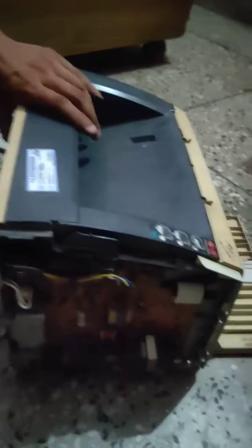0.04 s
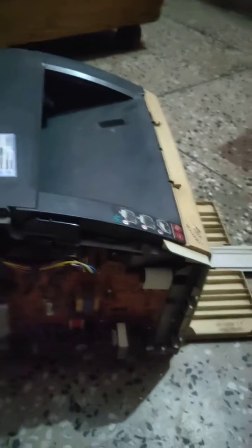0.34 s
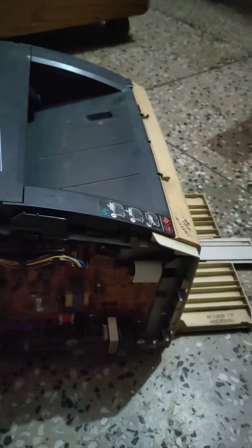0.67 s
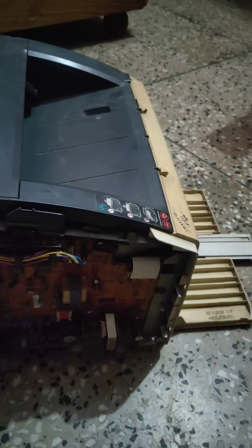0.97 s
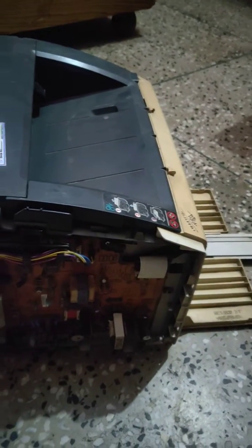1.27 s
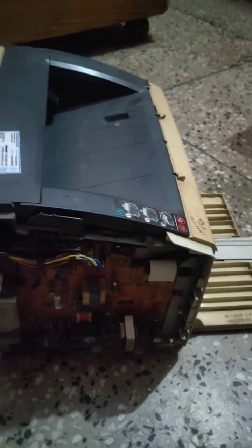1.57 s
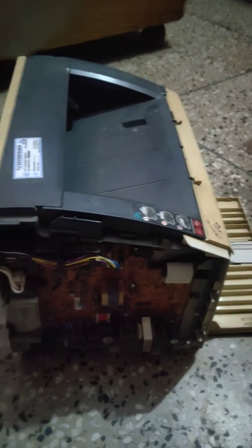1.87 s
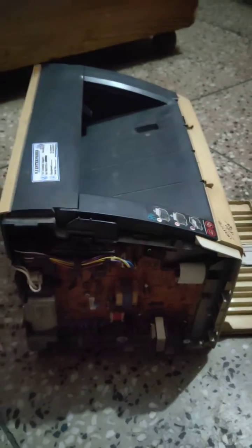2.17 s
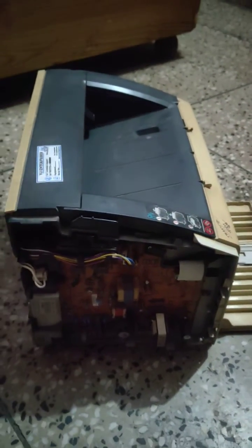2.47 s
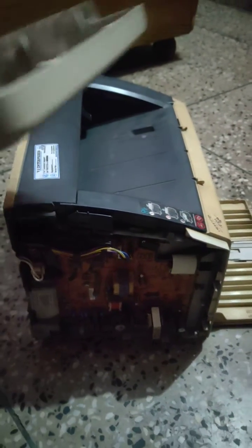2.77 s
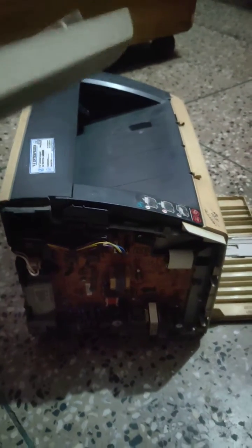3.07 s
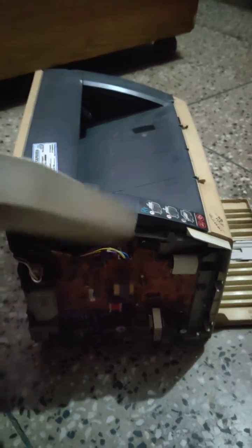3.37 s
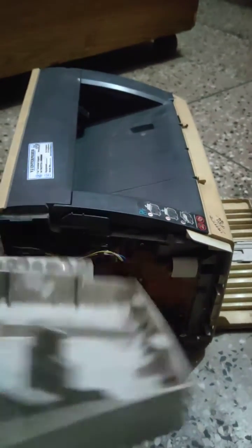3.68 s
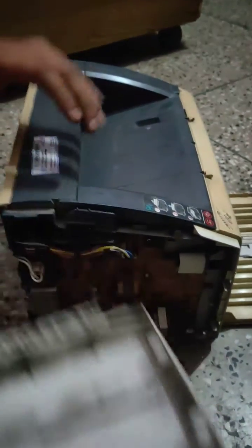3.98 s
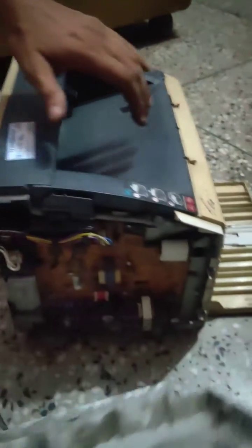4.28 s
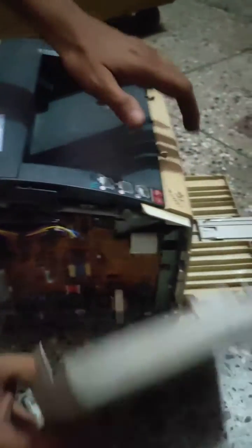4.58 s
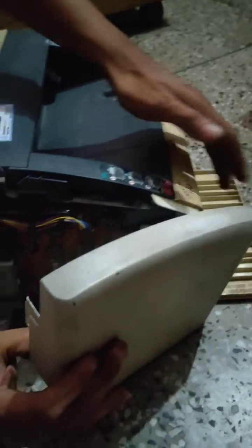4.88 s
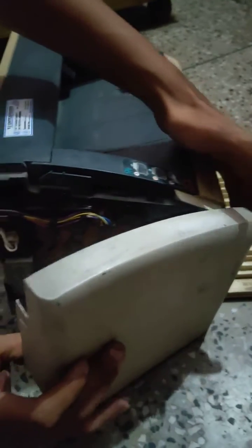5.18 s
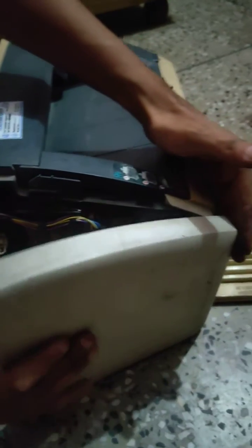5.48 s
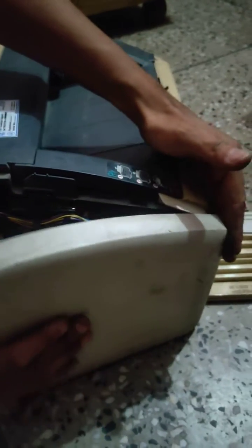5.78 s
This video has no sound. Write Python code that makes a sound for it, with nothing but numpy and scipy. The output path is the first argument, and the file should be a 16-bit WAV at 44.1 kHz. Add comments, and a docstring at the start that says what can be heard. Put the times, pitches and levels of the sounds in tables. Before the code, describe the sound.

A hard plastic cover is handled in a small room, giving three hollow knocks, then light scrapes and clicks.

```python
"""In a small room with a stone floor, someone handles a hard plastic printer cover.
It knocks as it is picked up, slides through the hand, snaps once and knocks down on its edge;
each blow sets the whole shell ringing. Then it scrapes and clicks against the dismantled machine
as the plastic sticks and slips and its tabs catch. Faint chirps, hum and hiss lie underneath."""
import sys
import numpy as np
from scipy import signal
from scipy.io import wavfile

SR = 44100
rng = np.random.default_rng(int(sys.argv[2]) if len(sys.argv) > 2 else 0)


def digitize_waveform(pressure):
    """Quantize a signal to 16-bit integers and store it at the path in sys.argv[1].

    Rows of a 2-D input are taken as channels; values are limited to [-1, 1].
    """
    field = np.atleast_2d(pressure).T
    bounded = np.clip(field, -1, 1)
    quanta = np.round(bounded * 32767).astype(np.int16)
    wavfile.write(sys.argv[1], SR, quanta)


N = 257544
TIME = np.arange(N) / SR  # seconds into the scene
RING = np.arange(int(SR * .7)) / SR  # seconds into one short sound

# Three hard blows, each on its own spot: (time [s], ring build-up [s], crack level [dB],
# crack pitch [Hz], crack width [Hz], crack decay [s], bounce delay [s], bounce level [dB],
# bounce pitch [Hz])
BLOWS = [(1.4578, 0.0082, -21, 1400, 1000, 0.0036, 0.00455, -13, 440),
         (4.3228, 0.0013, -15, 2570, 1700, 0.0048, 0.00593, -21, 660),
         (3.4742, 0.0016, -15, 3540, 1370, 0.0042, 0.0061, -19, 2300)]
# The shell's clear tones: (pitch [Hz], time to fade 60 dB [s], level at spot 1, 2, 3 [dB])
SHELL_TONES = [(150.0, 0.5, -50.0, -59.0, -72.0), (171.0, 0.5, -39.0, -59.0, -74.0),
               (228.0, 0.5, -29.0, -40.0, -75.0), (296.0, 0.34, -30.0, -44.0, -65.0),
               (319.0, 0.34, -23.0, -29.0, -61.0), (373.0, 0.34, -22.0, -23.0, -46.0),
               (405.0, 0.34, -27.0, -41.0, -52.0), (441.0, 0.34, -28.0, -32.0, -42.0),
               (500.0, 0.34, -31.0, -35.0, -51.0), (560.0, 0.22, -30.0, -20.0, -49.0),
               (586.0, 0.34, -29.0, -18.5, -50.0), (644.0, 0.34, -16.0, -19.0, -40.0),
               (765.0, 0.24, -30.0, -33.0, -41.0), (806.0, 0.24, -22.0, -36.0, -38.0),
               (860.0, 0.3, -29.0, -43.0, -53.0), (933.0, 0.3, -29.0, -32.0, -39.0),
               (1023.0, 0.3, -33.0, -30.0, -55.0), (1110.0, 0.3, -37.0, -37.0, -60.0),
               (1235.0, 0.3, -36.0, -30.0, -37.0), (1438.0, 0.3, -50.0, -37.0, -31.0),
               (1567.0, 0.3, -38.0, -35.0, -63.0), (1661.0, 0.3, -37.0, -31.0, -57.0),
               (1732.0, 0.3, -33.0, -31.0, -51.0), (1830.0, 0.3, -49.0, -34.0, -43.0),
               (2053.0, 0.3, -42.0, -32.0, -38.0), (2218.0, 0.3, -46.0, -37.0, -43.0),
               (2335.0, 0.3, -41.0, -28.0, -30.0), (2589.0, 0.3, -50.0, -36.0, -53.0),
               (2832.0, 0.3, -52.0, -38.0, -46.0), (3332.0, 0.3, -73.0, -45.0, -52.0)]
# Boost of those tones, one for each spot: (level [dB])
SPOT_BOOST_DB = [1, -1.5, -1.5]
# The blur of weaker tones between them: (pitch [Hz], time to fade 60 dB [s], level at spot 1, 2, 3 [dB])
WEAK_TONES = [(25, 0.61, -52, -38, -70), (81, 1, -22.5, -35, -52.5), (182, 0.81, -12.5, -33.5, -66),
              (333, 0.59, -8, -13, -36), (607, 0.41, -7, -8, -29), (885, 0.53, -11, -12.5, -24.5),
              (1600, 0.35, -13, -14, -26.5), (2286, 0.37, -19.5, -11.5, -18),
              (3430, 0.33, -25.5, -20.5, -31), (5790, 0.32, -33.5, -25.5, -28.5),
              (7700, 0.26, -35.5, -34, -41.5), (8000, 0.09, -66, -54, -67)]
def blows():
    """Each blow cracks, bounces within milliseconds and sets the whole shell ringing."""
    out, weak = np.zeros(N), np.array(WEAK_TONES)
    smother = np.exp(-(RING / 0.27) ** 2)  # the hand and the floor cut the ring short
    bounce = RING / .0014 * np.exp(1 - RING / .0014)  # a second, very brief contact
    for spot, blow in enumerate(BLOWS):
        start, build, crack_db, crack_hz, width, decay, delay, bounce_db, bounce_hz = blow
        tones = sum(amp(levels[spot]) * 1000. ** (-RING / fade) * sine(hz, RING)
                    for hz, fade, *levels in SHELL_TONES)
        blur = colour(fading_noise(weak[:, :2]), weak[:, [0, 2 + spot]])
        # the ring builds up as waves cross the shell, the blur first
        add(out, start, amp(SPOT_BOOST_DB[spot]) * tones * smother * (1 - np.exp(-RING / build)))
        add(out, start, blur * np.sqrt(smother) * (1 - np.exp(-2 * RING / build)))
        # a small contact gives off little bass
        crack = colour(burst(crack_hz, width, decay), [(100, -27.0), (700, -0.5)])
        add(out, start, amp(crack_db) * crack)
        add(out, start + delay, amp(bounce_db) * bounce * np.sin(2 * np.pi * bounce_hz * RING))
    return out


# Tabs and edges catching: (time [s], tick level [dB], knock level [dB], brightness [dB], rise [s])
CLICKS = [(1.599, -41, -31.5, -8.5, .008), (2.92, -48, -69, 2.5, .006), (3.237, -39, -61, -6.5, .007),
          (3.384, -31.5, -66, -12, .008), (4.7167, -36, -54, -3.5, .0025),
          (4.7895, -30, -30.5, -17.5, .004), (4.8114, -36.5, -37.5, -12.5, .002),
          (4.8234, -32.5, -27.5, -15.5, .0022), (4.8544, -33, -36, -25, .0035),
          (4.919, -38.5, -44, -24, .003), (5.118, -30.5, -40.5, -19.5, 0.0044),
          (5.156, -39.5, -57, -26, .0026), (5.547, -34.5, -37, -27.5, .0035),
          (5.5807, -23.5, -36.5, -5, .0017), (5.732, -36, -60, -16, .009), (5.7902, -38, -37, -21, .002)]
# The tone colour of a tab's tick: (pitch [Hz], level [dB])
CLICK_COLOUR = [(760, -26), (1300, -86), (1480, -57), (1620, 4), (1920, -8.5), (2180, 9), (2740, -4.5),
                (3020, 0), (3890, 0.5), (4390, -2), (5030, -15.5), (5860, -1), (6320, -27.5), (7590, -10),
                (8000, -43), (10400, -48.5), (17600, -120)]
def clicks():
    """Tabs catch and let go: a bright tick, duller where it chafes, and a knock of the hollow body."""
    ticks, body = np.zeros(N), np.zeros(N)
    for start, db, knock_db, treble_db, rise in CLICKS:
        contact = np.exp(-RING / (rise + 0.0007)) * (1 - np.exp(-RING / rise))
        tick = colour(rng.standard_normal(len(RING)) * contact, CLICK_COLOUR)
        tick = colour(tick, [(2000, 0), (3200, min(treble_db + 12, 0) * 0.7), (5500, treble_db + 11.5)])
        add(ticks, start, amp(db) * tick / abs(tick).max())
        knock = burst(hz=608, width_hz=150, decay_s=0.0074) * (1 - np.exp(-RING / 0.0018))
        add(body, start, amp(knock_db) * knock)
    ticks = flicker(room(ticks, echo_db=-5.5), depth_db=4.5, width_hz=220, hold_s=0.13)
    return ticks + room(body, echo_db=-3.5)


# Plastic sliding through the hand: (time [s], length [s], rise [s], level [dB])
RUBS = [(1.206, 0.052, .03, -67), (1.525, 0.062, 0.037, -58), (1.881, 0.018, 0.013, -78),
        (2.295, 0.039, 0.024, -45.5), (2.53, 0.084, 0.076, -60.5), (2.785, 0.42, 0.091, -60.5),
        (2.997, 0.46, .055, -47), (3.855, 0.012, 0.01, -60), (4.782, 0.1, .015, -56.5),
        (5.305, 0.051, .05, -47.5), (5.482, 0.063, 0.034, -48), (5.717, 0.02, 0.019, -54.5)]
# Tones of the panel under a light touch: (pitch [Hz], width [Hz], level [dB])
PANEL_TONES = [(2454, 110, -7.5), (3103, 130, -3.5), (3900, 250, -8), (4500, 120, -2), (5430, 490, 1),
               (5964, 200, 3.5), (7490, 110, -7)]
# The tone colour of a firm rub: (pitch [Hz], level [dB])
FIRM_COLOUR = [(700, -30.5), (1020, -15), (1200, -21.5), (1620, -26), (1840, -5.5), (2080, -4),
               (2250, -27.5), (2410, 1.5), (2600, -6), (2690, 4.5), (3160, 6), (4060, 1.5), (4390, -0.5),
               (6210, 0), (7580, -5.5), (8200, -24), (10700, -58), (18000, -120)]
def sliding():
    """Skin on textured plastic: a light touch wakes a few tones, a firm one makes a gritty hiss."""
    friction = room(slips(per_s=8000, spread_db=2.5), echo_db=-1)
    light = unit(sum(amp(db) * band(friction, hz, width) for hz, width, db in PANEL_TONES))
    light = flicker(light, depth_db=5.5, width_hz=180, hold_s=0.09)
    firm = flicker(unit(colour(friction, FIRM_COLOUR)), depth_db=5.5, width_hz=240, hold_s=0.11)
    rubs = [amp(db) * stroke(start, length, rise, fade_db_per_s=132) for start, length, rise, db in RUBS]
    # a tab skids on after it lets go, more so when its click is loud and bright
    skids = [amp(-25 + 0.58 * (db + treble_db)) * stroke(start, 0.0017, 0.0017, fade_db_per_s=150)
             for start, db, _, treble_db, _ in CLICKS]
    pressure = np.linalg.norm(rubs + skids, axis=0)
    firmness = pressure / (pressure + amp(-50))  # the hiss takes over around -50 dB
    return pressure * (np.sqrt(firmness) * firm + (1 - firmness) * light)


# The shell being dragged: (time [s], length [s], level [dB], rumble level [dB], scrape pitch [Hz])
DRAGS = [(0.17, 0.15, -69.5, -66, 700), (0.587, 0.088, -57, -65, 646), (1.102, 0.27, -76, -63.5, 686),
         (1.669, 0.3, -63, -82, 866), (2.093, .4, -67, -76, 700), (2.563, 0.29, -64, -68.5, 926),
         (3.021, 0.15, -57, -55.5, 897), (3.253, 0.13, -68.5, -70, 900), (3.885, 0.47, -60.5, -61, 962),
         (4.583, 0.063, -58.5, -71, 1015), (4.764, 0.14, -48.5, -65, 538), (5.049, .1, -54.5, -57.5, 967),
         (5.297, 0.18, -57, -61, 700), (5.48, 0.15, -53.5, -57.5, 620), (5.697, .12, -64, -65, 600)]
# Tones of the cover's hollow: (pitch [Hz], width [Hz], level [dB])
HOLLOW_TONES = [(324, 180, -6), (403, 60, -4.5), (599.5, 91, 0), (743.4, 39, 5.5), (1006, 146, 1)]
def dragging():
    """Coarser slips ring the hollow of the cover and make a gliding scrape, over a low rumble."""
    friction = slips(per_s=700, spread_db=4.5)
    hollow = sum(amp(db) * band(friction, hz, width) for hz, width, db in HOLLOW_TONES)
    hollow = flicker(unit(room(hollow, echo_db=-2.0)), depth_db=9.0, width_hz=250, hold_s=0.11)
    starts, lengths, level_db, rumble_db, pitches = np.transpose(DRAGS)
    moves = np.array([stroke(start, length, rise_s=0.053, fade_db_per_s=115)
                      for start, length in zip(starts, lengths)])
    glide_hz = np.interp(TIME, starts + lengths / 2, pitches)
    scrape = unit(resonate(resonate(friction, glide_hz, width_hz=120), glide_hz, width_hz=76))
    rumble = unit(band(rng.standard_normal(N), hz=85, width_hz=110))
    return (hollow + amp(-2) * scrape) * (amp(level_db) @ moves) + rumble * (amp(rumble_db) @ moves)


# Dull bumps of fingers on the shell: (time [s], level [dB], pitch [Hz])
BUMPS = [(0.003, -37.5, 773), (0.165, -50, 675), (0.281, -45.5, 1140), (0.794, -48.5, 717),
         (1.404, -45, 645), (1.817, -43.5, 814), (2.209, -54, 950), (2.527, -48.5, 740),
         (2.628, -48.5, 754), (2.744, -43.5, 316), (2.799, -44, 1027), (3.047, -47.5, 420),
         (3.288, -47.5, 754), (3.624, -44.5, 722), (3.783, -49.5, 553), (3.897, -44.5, 988),
         (4.03, -44.5, 904), (4.205, -40, 693), (4.904, -34, 530), (5.07, -38.5, 570), (5.122, -34.5, 1043),
         (5.489, -32, 578)]
# Soft, low thumps of handling: (time [s], level [dB], pitch [Hz])
THUMPS = [(0.19, -46, 85.5), (1.622, -52, 218), (3.238, -45.5, 97.7), (3.583, -52, 112),
          (3.896, -46.5, 105.3), (4.849, -39, 280), (5.256, -44, 95), (5.494, -44.5, 318),
          (5.682, -39.5, 94)]
TAPS_PER_S, TAP_DB, TAP_SPREAD_DB, TAP_HZ, TAP_SPREAD_OCTAVES = 4.4, -57.5, 0.5, 786, 0.41
def bumps():
    """Soft bumps, thumps and random light finger taps each wake a narrow, low range of the shell."""
    out = np.zeros(N)
    times = np.flatnonzero(rng.random(N) < TAPS_PER_S / SR) / SR
    taps = [(start, TAP_DB - TAP_SPREAD_DB * softness, TAP_HZ * 2 ** (TAP_SPREAD_OCTAVES * spot))
            for start, (softness, spot) in zip(times, rng.standard_normal((len(times), 2)))]
    for start, db, hz in THUMPS:
        add(out, start, amp(db) * burst(hz, width_hz=66, decay_s=0.021))
    soft_start = 1 - np.exp(-RING / 0.0028)
    for start, db, hz in BUMPS + taps:
        add(out, start, amp(db) * burst(hz, width_hz=87, decay_s=0.01) * soft_start)
    return room(out, echo_db=-4.0)


# Tones of a small part: (pitch [Hz], level [dB], time to fade 60 dB [s])
SMALL_PART_TONES = [(2640, -58.5, 0.18), (4090, -62.5, 0.24), (4580, -57.5, 0.16), (5670, -58, 0.28),
                    (5930, -58, 0.19), (6740, -73, 0.17)]
def small_part():
    """A small part is brushed once and rings briefly."""
    out = np.zeros(N)
    soft_start = np.clip(RING / 0.013, 0, 1)
    for hz, db, fade in SMALL_PART_TONES:
        tone = burst(hz, width_hz=135, decay_s=fade / np.log(1000))
        add(out, start_s=0.6685, sound=amp(db) * tone * soft_start)
    return out


# Brief, faint chirps: (time [s], length [s], pitch [Hz], level [dB])
CHIRPS = [(2.295, 0.069, 2510, -55.5), (2.3, 0.088, 3430, -54), (1.809, 0.12, 2450, -60.5),
          (2.568, 0.063, 3790, -67), (2.589, 0.06, 1370, -55.5), (2.8, 0.1, 3480, -68.5),
          (2.91, .13, 3940, -62), (3.38, 0.07, 1700, -56.5), (5.298, 0.12, 3140, -51.5),
          (5.322, 0.063, 1650, -55.5), (5.329, .09, 4270, -54.5), (5.482, 0.11, 3260, -56),
          (5.727, 0.064, 2250, -51.5)]
def chirps():
    """Brief, faint, narrow chirps each swell and fade around one pitch."""
    out = np.zeros(N)
    for start, length, hz, db in CHIRPS:
        swell = np.sin(np.pi * np.clip(RING / length, 0, 1))
        chirp = unit(band(rng.standard_normal(len(RING)), hz, width_hz=170))
        add(out, start, amp(db) * swell * chirp)
    return room(out, echo_db=-5.5)


# How long the room echoes: (pitch [Hz], time to fade 60 dB [s])
ECHO_FADES = [(100, 0.32), (600, 0.31), (2400, 0.32), (8000, 0.29)]
def room(x, echo_db):
    """Adds the short echo of a room with a hard floor."""
    tail = fading_noise(ECHO_FADES) * np.clip(RING / 0.017, 0, 1)
    return x + amp(echo_db) * signal.oaconvolve(x, tail / np.linalg.norm(tail))[:N]


# The tone colour of the room's own noise: (pitch [Hz], level [dB])
ROOM_COLOUR = [(15, -16.5), (25, -5), (69, -6.5), (262, -4), (311, 2), (584, -11), (726, -3.5), (1300, -13),
               (1820, -17.5), (2060, -5), (2330, -13.5), (3260, -22.5), (4810, -30.5), (5430, -25.5),
               (8200, -42.5), (10700, -78), (18000, -120)]
# Hum of the mains power: (pitch [Hz], level [dB])
HUM_TONES = [(50, -72), (100, -75.5)]
def room_noise():
    """A low, gently flickering rush and a steady electric hum."""
    rush = amp(-65) * unit(colour(rng.standard_normal(N), ROOM_COLOUR))
    rush = flicker(rush, depth_db=5.0, width_hz=74, hold_s=0.064)
    hum = sum(amp(db) * np.sqrt(2) * sine(hz, TIME) for hz, db in HUM_TONES)
    return rush + hum


# How loud the low, middle and high hiss are over time: (time [s], level [dB])
LOW_HISS = [(0, -67), (.5, -64), (1.3, -65.5), (2.2, -61.5), (2.6, -73.5), (5.8, -83.5)]
MID_HISS = [(0, -64.5), (.5, -62), (.8, -79), (1.25, -60), (2.1, -59), (3.1, -67), (4.5, -65), (5.6, -55)]
HIGH_HISS = [(0, -85), (1.1, -84.5), (1.28, -69), (2.2, -84.5), (2.7, -70.5), (4.1, -77.5), (5.8, -74.5)]
WANDER_HZ, SWELL_DB = 35, 4.5
def hiss():
    """Three faint, narrow bands of hiss wander in pitch, swell, sink and flicker."""
    out = np.zeros(N)
    for levels, hz, width_hz in (LOW_HISS, 1636, 210), (MID_HISS, 2057, 190), (HIGH_HISS, 5390, 730):
        pitch = hz + WANDER_HZ * drift(per_s=20)
        noise = resonate(band(rng.standard_normal(N), pitch, width_hz), pitch, width_hz)
        swell = amp(SWELL_DB * np.tanh(drift(per_s=16)))
        noise = flicker(unit(noise * swell), depth_db=5.5, width_hz=160, hold_s=.05)
        out += amp(np.interp(TIME, *np.transpose(levels))) * noise
    return out


def amp(db):
    """Turns decibels into a number to multiply by."""
    return 10 ** (np.asarray(db) / 20)


def unit(x):
    """Scales a signal to an average power of 1."""
    return x / np.sqrt(np.mean(x ** 2) + 1e-20)


def sine(hz, t):
    """A pure tone that starts at a random point in its cycle."""
    return np.sin(2 * np.pi * (hz * t + rng.random()))


def look_up(points, hz):
    """Reads between the rows of a (pitch, value) table."""
    pitches, values = np.transpose(points)
    return np.interp(np.log(hz + 1), np.log(pitches + 1), values)


def add(mix, start_s, sound):
    """Mixes a sound in at its start time."""
    part = mix[max(round(start_s * SR), 0):][:len(sound)]
    part += sound[:len(part)]


def colour(x, points):
    """Turns each pitch up or down by a (pitch, level) table, with no ringing ahead of the sound."""
    gain_db = np.maximum(look_up(points, abs(np.fft.fftfreq(4096, 1 / SR))), -100)
    spectrum = np.exp(np.conj(signal.hilbert(np.log(amp(gain_db)))))
    response = np.fft.ifft(spectrum).real
    return signal.oaconvolve(x, response[:len(response) // 2])[:len(x)]


def resonate(x, hz, width_hz):
    """Rings at one pitch, which may glide; a smaller width rings longer."""
    turn = np.exp(2j * np.pi * np.cumsum(hz * np.ones(len(x))) / SR)
    feedback = np.exp(-np.pi * width_hz / SR)
    return 2 * (turn * signal.lfilter([1 - feedback], [1, -feedback], x / turn + 1e-18)).real


def band(x, hz, width_hz):
    """Keeps the sound near one pitch by resonating twice."""
    return resonate(resonate(x, hz, width_hz), hz, width_hz)


def fading_noise(fades):
    """Noise in which each pitch dies away at its own speed."""
    hz, t, bands = signal.stft(rng.choice([-1., 1.], len(RING)), SR, nperseg=256)
    fade = 1000. ** (-t / look_up(fades, hz)[:, None])
    return signal.istft(bands * fade, SR)[1][:len(RING)]


def burst(hz, width_hz, decay_s):
    """A brief rattle of contact around one pitch."""
    noise = band(rng.standard_normal(len(RING)), hz, width_hz)[::-1]  # reversed to start at full strength
    shape = np.exp(-RING / decay_s) * (1 - np.exp(-RING * hz * 2))
    return unit(noise * shape) * np.sqrt(np.mean(shape ** 2))


def slips(per_s, spread_db):
    """Surfaces stick and slip: many tiny kicks, a few of them large."""
    size = amp(spread_db * np.minimum(rng.exponential(1, N), 4))
    return size * rng.choice([-1., 1.], N) * (rng.random(N) < per_s / SR)


def stroke(start_s, length_s, rise_s, fade_db_per_s):
    """The loudness of one movement: it builds up, holds and dies away."""
    t = TIME - start_s
    return np.clip(t / rise_s, 0, 1) * amp(-fade_db_per_s * np.maximum(t - length_s, 0))


def drift(per_s):
    """A slow random curve."""
    return unit(band(rng.standard_normal(N), 0, per_s))


def flicker(x, depth_db, width_hz, hold_s):
    """Narrow ranges of pitch swell and fade on their own; the overall level stays the same."""
    hz, t, bands = signal.stft(x, SR, nperseg=1024, noverlap=768)
    across, along = np.fft.fftfreq(len(hz), hz[1])[:, None], np.fft.fftfreq(len(t), t[1])
    blur = np.exp(-(across * width_hz) ** 2 - (along * hold_s) ** 2)
    patches = unit(np.fft.ifft2(np.fft.fft2(rng.standard_normal(bands.shape)) * blur).real)
    gain = amp(depth_db * 2 * np.tanh(patches / 2))
    return unit(signal.istft(bands * gain, SR, nperseg=1024, noverlap=768)[1][:len(x)]) * np.std(x)


def scene():
    """The handling sounds and faint chirps over the quiet room."""
    events = blows() + clicks() + small_part() + bumps() + sliding() + chirps() + dragging()
    return (events + room_noise() + hiss())[None]


def record(dry):
    """Cuts away the treble above 8350 Hz."""
    treble_cut = signal.firwin(255, 8350, window=("kaiser", 8), fs=SR)
    return signal.oaconvolve(dry, treble_cut[None], "same")


dry = scene()
out = record(dry)
digitize_waveform(out)
```